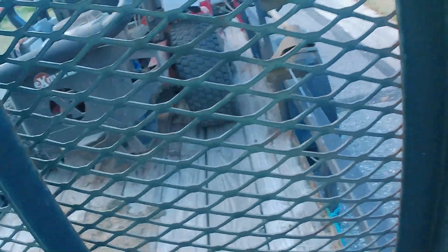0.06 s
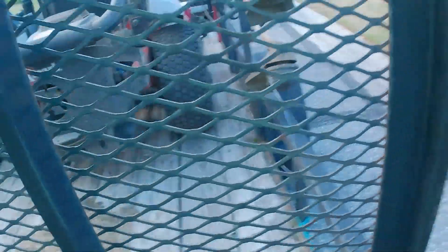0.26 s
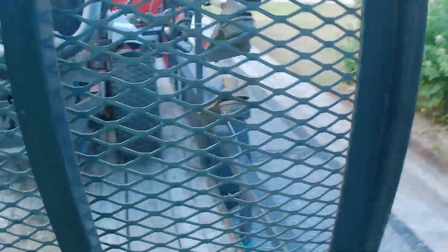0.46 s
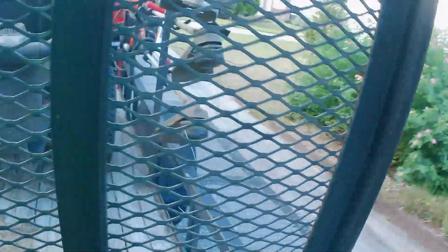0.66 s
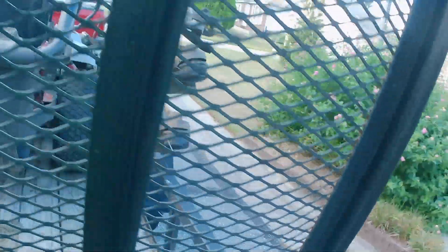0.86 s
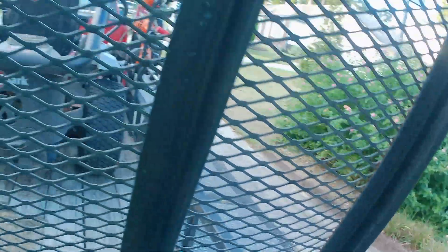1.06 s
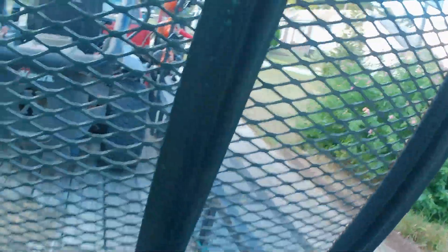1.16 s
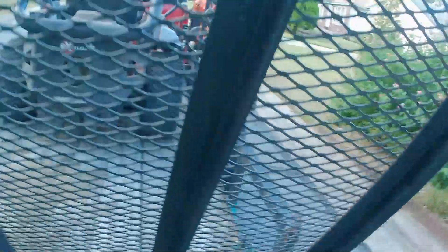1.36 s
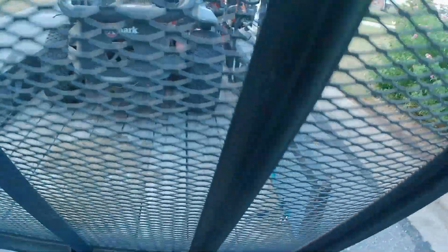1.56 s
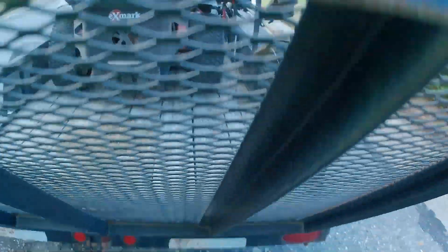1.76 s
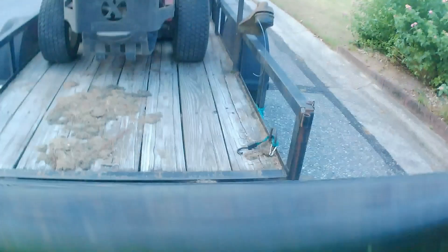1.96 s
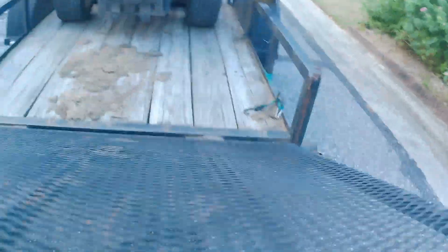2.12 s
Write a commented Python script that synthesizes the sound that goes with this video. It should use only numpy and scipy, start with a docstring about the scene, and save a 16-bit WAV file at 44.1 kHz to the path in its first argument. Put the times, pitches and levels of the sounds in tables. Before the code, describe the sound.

Close by in quiet outdoor air, a metal mesh gate on a trailer scrapes and bangs hard. Further clanks set the mesh clattering and the steel ringing, then a lighter rattle dies away above a faint hum.

```python
"""A steel-mesh trailer gate is worked loose and swung down outdoors, over a faint low hum.
First steel grinds on steel with thin squeals, and the flexing panel shudders. At 0.26 s the gate slams
into its stop, then clanks against its fittings; each blow sets the mesh clattering and the frame ringing.
From about 1 s it rattles more softly on its hinges, with a soft bump of air at 1.24 s and a small dry
tick at 1.6 s, and by 2 s the last rattle is dying away."""
import sys
import numpy as np
from scipy import signal
from scipy.io import wavfile

SR = 44100
rng = np.random.default_rng(int(sys.argv[2]) if len(sys.argv) > 2 else 0)


def master_out(mix):
    """Clip the mix to full scale and print it as 16-bit PCM to the path in sys.argv[1]."""
    frames = np.transpose(np.atleast_2d(mix))
    ceiling = np.clip(frames, -1, 1)
    pcm = np.round(ceiling * 32767).astype(np.int16)
    wavfile.write(sys.argv[1], SR, pcm)


N = 97020
T = np.arange(N) / SR
BANDS_HZ = 25 * 2 ** (np.arange(29) / 3)
REGISTER_HZ = (400, 1050, 2600, 7500)  # bass, mids, high mids, treble


# Hits of the gate on its fittings; bass, high mids and treble are set against the mids:
# (time [s], mid level [dB], bass [dB], high mids [dB], treble [dB], frame ring [dB], contact time [s])
BLOWS = [(.256, -18, -2, -4, -4, 2, .005), (0.344, -23, -1.5, 0, -9, -8, .010),
         (0.513, -28, -1.5, 2, -14, -15, 0.0052), (0.595, -33.5, -2, 2.5, -3.5, -11, 0.01),
         (0.7713, -20, -3.5, -1, -10, -16, 0.0037), (0.9514, -24.5, -16, -2, -27.5, -16, .002),
         (1.08, -36, -13.5, -7.5, -37, -13, 0.0037), (1.107, -45.5, 2.5, -2.5, -34, -8, 0.0031),
         (1.167, -49.5, 4, -2, -3.5, -18, 0.0043), (1.239, -60, 9, -2, -3, -26, 0.0057),
         (1.333, -34, .5, -13, -21, -9, 0.0031), (1.369, -38, 2.5, -8.5, -25.5, -25, 0.0051),
         (1.418, -60, .5, 3, -15, -17, 0.003), (1.446, -37, 2, -7, -25.5, -13, 0.0032),
         (1.522, -47, 3, -7.5, -26, -2.5, .003), (1.567, -43, 1.5, -8.5, -34, -13, 0.0025),
         (1.616, -46.5, 5, -4, -27, -7, 0.0025), (1.751, -43.5, 5.5, -2.5, -19, -13, 0.0038),
         (1.762, -35.5, -2, 0, -16.5, -5, 0.0082), (1.904, -62, -1, 5.5, -11, -19.5, 0.0041),
         (1.978, -49, 7, -10, -26, -19.5, 0.0032)]
def blows():
    """Each hit is a sudden push that eases off: (energy feed over time, level in each register)."""
    contacts = []
    for start, db, bass, high_mids, treble, _, contact_s in BLOWS:
        progress = np.clip((T - start) / contact_s / 2, 0, 1)
        push = (progress > 0) * (1 - progress) ** 2
        contacts.append((push / push.sum(), db + np.array([bass, 0, high_mids, treble])))
    return contacts


# Gritty slides of steel on steel:
# (time [s], length [s], bass [dB], mids [dB], high mids [dB], treble [dB])
SCRAPES = [(0.07, 0.026, -60, -43, -55.5, -58), (0.089, 0.032, -44, -44.5, -43.5, -40),
           (.125, 0.055, -44, -43.5, -55, -50), (0.154, 0.019, -45, -39, -36, -30.5),
           (0.182, 0.039, -28, -30, -32.5, -32), (0.369, 0.026, -25, -28, -28, -25.5),
           (0.395, 0.045, -31, -36, -39, -80.5), (0.642, 0.034, -41, -62, -47, -92),
           (0.701, 0.0052, -38, -44, -41, -38), (0.709, .03, -38.5, -42, -56, -84),
           (0.929, 0.04, -37, -47, -47.5, -43.5), (.962, 0.011, -34, -41, -39.5, -55),
           (1.026, 0.052, -43.5, -51, -49.5, -54.5), (1.243, 0.007, -50, -73, -47.5, -53),
           (1.256, 0.037, -47, -56.5, -68, -76), (1.868, 0.051, -52.5, -77, -71, -82)]
def scrapes(slips_per_s=1100, spread_db=2, gain_db=-0.5):
    """Each scrape is a swelling run of tiny uneven slips: (energy feed, level in each register)."""
    slips = (rng.random(N) < slips_per_s / SR) * from_db(spread_db * rng.standard_normal(N)) ** 2
    contacts = []
    for start, length, *levels_db in SCRAPES:
        swell = np.sqrt(np.clip((T - start) / length, 0, 1)) * (T < start + length)
        push = (slips + 1e-6) * swell
        energy = length / 0.017  # 17 ms of sliding feeds in as much as one blow
        contacts.append((energy * push / (push.sum() + 1e-20), np.array(levels_db) + gain_db))
    return contacts


# Tone colour of the mesh: (frequency [Hz], band gain [dB])
MESH_COLOUR = [(110, -27.5), (150, -21.5), (200, -14.5), (320, -12.5), (500, -6.5), (630, -5.5),
               (780, -9.5), (1000, -7), (1250, -3), (1600, -6), (2400, -3.5), (3900, -4.5), (5000, -6.5),
               (6500, -6.5), (10000, -6.5), (12500, -19.5), (15500, -35)]
# Its short clatter and quieter tail: (frequency [Hz], clatter t60 [s], tail t60 [s], tail level [dB])
MESH_DECAY = [(206, 0.29, .7, -6), (1000, 0.17, 0.39, -7.5), (2600, 0.089, 0.51, -15.5),
              (9000, 0.092, 0.31, -9.5)]
def mesh(contacts):
    """The countless close modes of the mesh take up each contact's energy, clatter briefly and linger."""
    pushes = np.array([push for push, _ in contacts])
    out = np.zeros(N)
    for hz in BANDS_HZ[BANDS_HZ >= 100]:
        fed = np.array([register_gain(levels, hz) ** 2 for _, levels in contacts]) @ pushes
        clatter_t60, tail_t60, tail_db = (at_hz(MESH_DECAY, hz, column) for column in (1, 2, 3))
        energy = die_away(fed, clatter_t60) + die_away(fed, tail_t60) * from_db(tail_db) ** 2
        out += from_db(at_hz(MESH_COLOUR, hz)) * np.sqrt(energy) * band_noise(hz)
    return out


def wires(contacts, count=70, low_hz=1396.4, high_hz=11800, t60=0.18, gain_db=-5.5):
    """Single wires of scattered pitch jingle, each touched with a different strength by every contact."""
    pushes = np.array([push for push, _ in contacts])
    out = np.zeros(N)
    for k, offset in enumerate(rng.random(count)):
        hz = low_hz * (high_hz / low_hz) ** ((k + offset) / count)
        touch = from_db(-1.5 * np.clip(rng.standard_normal(len(contacts)), -2, 1))
        strengths = touch * np.array([register_gain(levels, hz) for _, levels in contacts])
        envelope = np.sqrt(die_away(strengths ** 2 @ pushes, t60))
        out += from_db(at_hz(MESH_COLOUR, hz)) * envelope * np.sin(2 * np.pi * hz * T)
    return from_db(gain_db) * out / np.sqrt(count / 10)


# Clang of the mesh panel: (frequency [Hz], relative level [dB], t60 [s])
PANEL_MODES = [(225.9, -13, 0.22), (310.1, -9, 0.29), (349.5, -13, 0.31), (442, -7, .22),
               (532, -22.5, 0.12), (580, -2.5, 0.078), (642, -10, .2), (831.6, -12.5, 0.17),
               (1040.4, -6.5, 0.11), (1168, -8, .13), (1268, -10, .16), (1397, -10.5, 0.096),
               (1880, -9, 0.13), (2322, -13.5, .22), (2963, -10.5, 0.16)]
# Ring of the tubular frame: (frequency [Hz], relative level [dB], t60 [s])
FRAME_MODES = [(185.7, -11, .3), (213.2, -13, 0.87), (324.7, -14.5, 0.65), (566, -4.5, 0.22),
               (646.7, -9, 0.2), (1014, -1, 0.081), (1081, -7, 0.26), (1272, -5.5, 0.051), (2084, -4, 0.31),
               (4188, -5.5, 0.083), (3980, -13, 0.43), (5570, -10.5, 0.093), (6540, -10, 0.12)]
# Bright ping of the latch: (frequency [Hz], relative level [dB], t60 [s])
LATCH_MODES = [(7537, -23, .22), (7983, -22, .35), (9550, -20, .3), (9740, -20, .35), (10860, -22, .15),
               (12050, -29, .3)]
def ringing_steel(latch_free_s=0.7, latch_muted_db=-18):
    """Panel, frame and latch ring under the blows; once the latch is free, blows hardly reach it."""
    panel = struck_modes(PANEL_MODES, np.zeros(len(BLOWS)))
    frame = struck_modes(FRAME_MODES, [ring_db for *_, ring_db, _ in BLOWS])
    latch_db = [0 if start < latch_free_s else latch_muted_db for start, *_ in BLOWS]
    return panel + frame + struck_modes(LATCH_MODES, latch_db)


def struck_modes(modes, sends_db, spread_db=2.5, gain_db=3.5):
    """Every blow, at its own send level, strikes each mode with a random strength, delay and polarity."""
    out = np.zeros(N)
    for hz, mode_db, t60 in modes:
        strikes = np.zeros(N)
        for (start, db, bass, high_mids, treble, _, contact_s), send_db in zip(BLOWS, sends_db):
            force, lag = rng.uniform(-1, 1, 2)
            colour = register_gain([bass, 0, high_mids, treble], hz)
            strength = colour * from_db(db + mode_db + send_db + spread_db * force)
            strikes[int((start + contact_s * abs(lag) / 2) * SR)] += strength * np.sign(lag)
        decay, angle = from_db(-60 / (t60 * SR)), 2 * np.pi * hz / SR
        resonator = [0, np.sin(angle)], [1, -2 * decay * np.cos(angle), decay ** 2]
        out += signal.lfilter(*resonator, strikes + 1e-18)
    return from_db(gain_db) * out


def slam(time_s=0.2603, db=-1.5, hz=900, half_width_s=0.0006):
    """One short pressure pulse as the gate hits its stop."""
    return from_db(db) * bell_curve(time_s, half_width_s) * np.cos(2 * np.pi * hz * (T - time_s))


# Low wobbles of the panel: (peak time [s], half length [s], pitch [Hz], level before the low cut [dB])
SHUDDERS = [(0.201, 0.011, 175, -40.5), (.212, 0.019, 275, -28.5), (0.45, 0.036, 215, -37),
            (0.735, 0.024, 190, -44), (1.077, 0.05, 185, -40)]
def shudders(width_hz=60):
    """The panel flexes in short, low swells."""
    return sum(from_db(db) * bell_curve(peak_s, half_s) * wavering_tone(hz, width_hz)
               for peak_s, half_s, hz, db in SHUDDERS)


# Thin, high squeals: (time [s], length [s], pitch [Hz], level [dB])
SQUEALS = [(.042, 0.025, 6190, -62.5), (0.05, 0.16, 5400, -67), (0.088, 0.069, 9620, -45),
           (.13, 0.024, 7950, -48.5), (.135, .025, 12200, -58), (.105, .055, 14700, -66)]
def squeals(width_hz=75):
    """Wavering tones swell and fade as the steel starts to slide."""
    out = np.zeros(N)
    for start, length, hz, db in SQUEALS:
        progress = np.clip((T - start) / length, 0, 1)
        arch = np.abs(np.sin(np.pi * progress)) ** 0.5
        out += from_db(db) * arch * wavering_tone(hz, width_hz)
    return out


def tick(time_s=1.601, t60=0.0056, band_hz=(4000, 11000), top_hz=10630):
    """A small dry tick close by: a bright burst of noise with no ring."""
    envelope = (T >= time_s) * from_db(-27 - 60 * np.abs(T - time_s) / t60)
    burst = envelope * rng.standard_normal(N)
    bright = signal.lfilter(*signal.butter(1, band_hz, "band", fs=SR), burst)
    return signal.sosfilt(signal.butter(4, top_hz, fs=SR, output="sos"), bright)


# Bed of outdoor air: (frequency [Hz], band level [dB])
AIR_BED = [(25, -60.5), (55, -69), (80, -63), (120, -58), (200, -71), (500, -75), (1000, -68.5),
           (2500, -79), (6000, -84.5), (15000, -86)]
# Low hum underneath: (pitch [Hz], level [dB])
HUM_TONES = [(57, -57), (113, -59.5)]
def outdoors(buffet_s=1.243, buffet_db=-42.5):
    """Quiet air, a wavering hum and one soft buffet as air bumps the microphone."""
    air = sum(from_db(at_hz(AIR_BED, hz)) * band_noise(hz) for hz in BANDS_HZ)
    hum = sum(from_db(db) * wavering_tone(hz, width_hz=5) for hz, db in HUM_TONES)
    swell = from_db(buffet_db) * bell_curve(buffet_s, half_width_s=0.036)
    return air + hum + swell * wavering_tone(hz=46, width_hz=25)


def from_db(db):
    return 10 ** (np.asarray(db) / 20)


def unit_rms(x):
    return x / np.sqrt(np.mean(x ** 2) + 1e-20)


def bell_curve(peak_s, half_width_s):
    return np.exp(-((T - peak_s) / half_width_s) ** 2)


def at_hz(table, hz, column=1):
    """Read a column of a table on a log-frequency axis."""
    table = np.array(table)
    return np.interp(np.log(hz), np.log(table[:, 0]), table[:, column])


def register_gain(levels_db, hz):
    """Gain of one contact at a frequency, from its four register levels."""
    return from_db(np.interp(np.log(hz), np.log(REGISTER_HZ), levels_db))


def band_noise(hz):
    """A third of an octave of noise, rms 1."""
    band = signal.butter(2, hz * 2 ** (np.array([-1, 1]) / 6), "band", fs=SR, output="sos")
    return unit_rms(signal.sosfilt(band, rng.standard_normal(N + SR // 2))[-N:])


def wavering_tone(hz, width_hz):
    """A sine whose pitch wanders at random, rms 1."""
    smoothing = signal.butter(2, width_hz, fs=SR, output="sos")
    wander = unit_rms(signal.sosfilt(smoothing, rng.standard_normal(N)))
    return unit_rms(np.sin(2 * np.pi * np.cumsum(hz + width_hz / 2 * wander) / SR))


def die_away(energy, t60):
    """Stored energy falls by 60 dB in t60 seconds."""
    return signal.lfilter([1], [1, -from_db(-60 / (t60 * SR)) ** 2], energy + 1e-20)


def scene(low_cut_hz=125):
    """The gate, close by, over the outdoor bed, in mono."""
    contacts = blows() + scrapes()
    steel = ringing_steel() + mesh(contacts) + wires(contacts) + shudders()
    # the gate's sounds carry little below the low cut
    gate = signal.sosfilt(signal.butter(2, low_cut_hz, "high", fs=SR, output="sos"), steel)
    return (gate + slam() + squeals() + tick() + outdoors())[None]


def record(dry, stopband_hz=16600):
    """Peaks clip at full scale, then a steep high cut takes off the very top."""
    return signal.sosfilt(signal.cheby2(16, 70, stopband_hz, fs=SR, output="sos"), np.clip(dry, -1, 1))


dry = scene()
out = record(dry)
master_out(out)
```